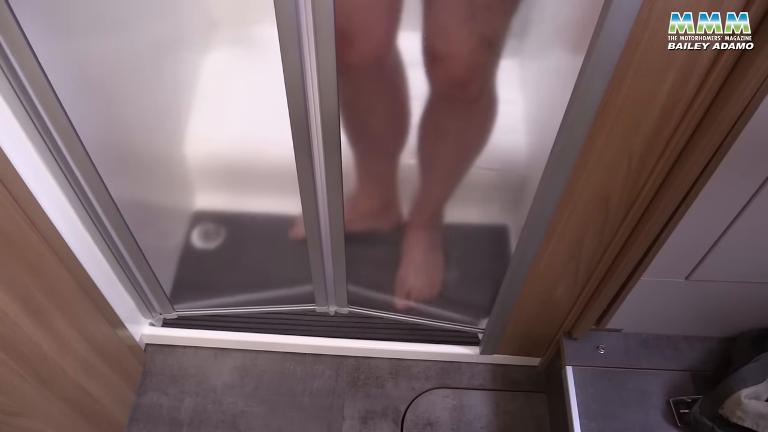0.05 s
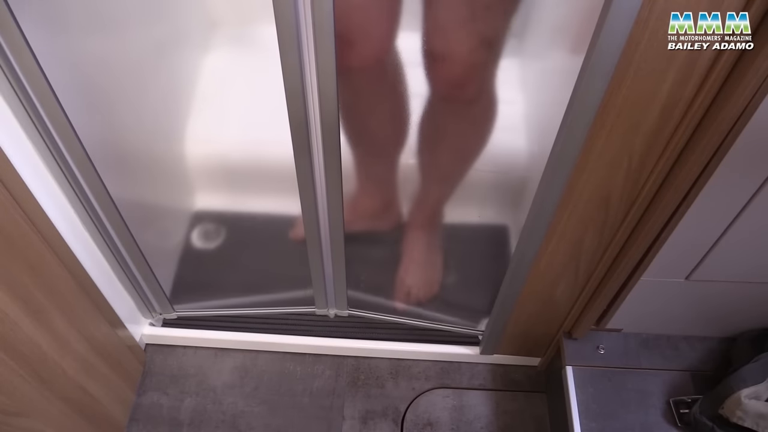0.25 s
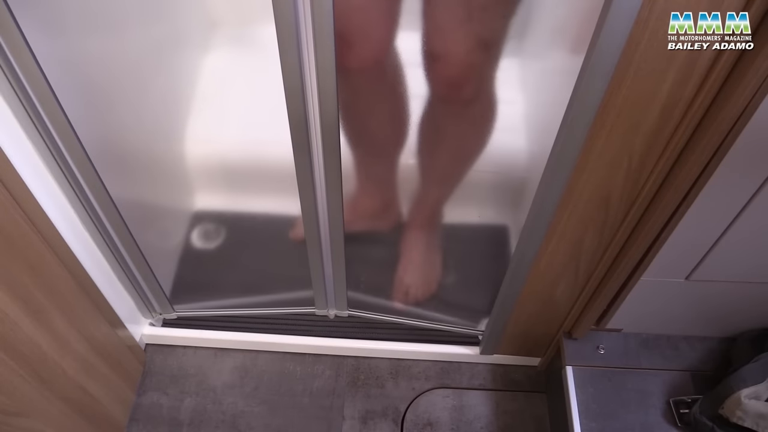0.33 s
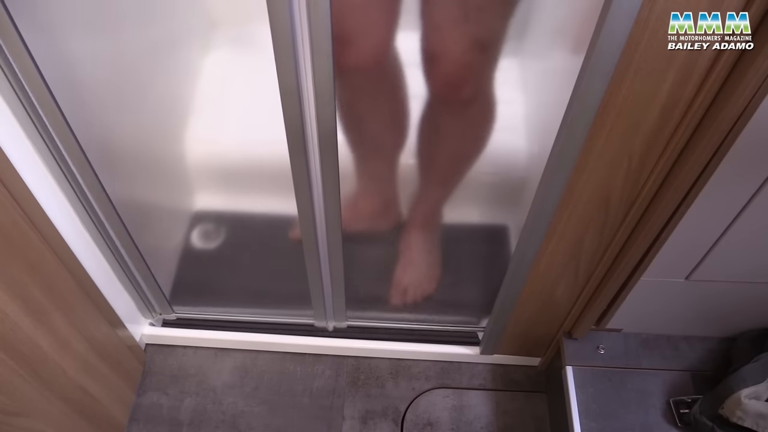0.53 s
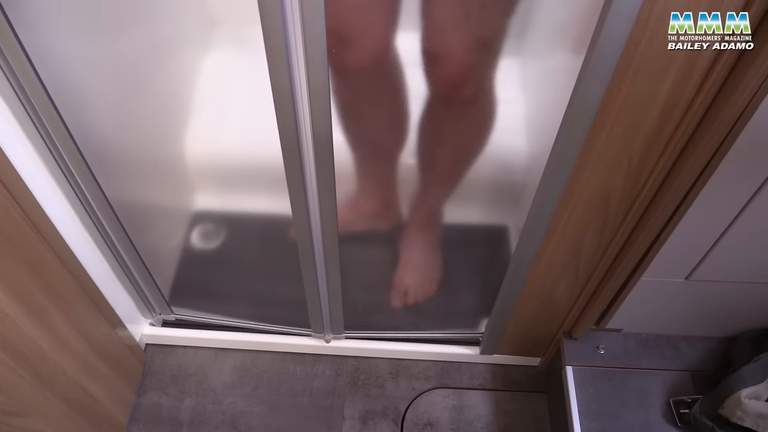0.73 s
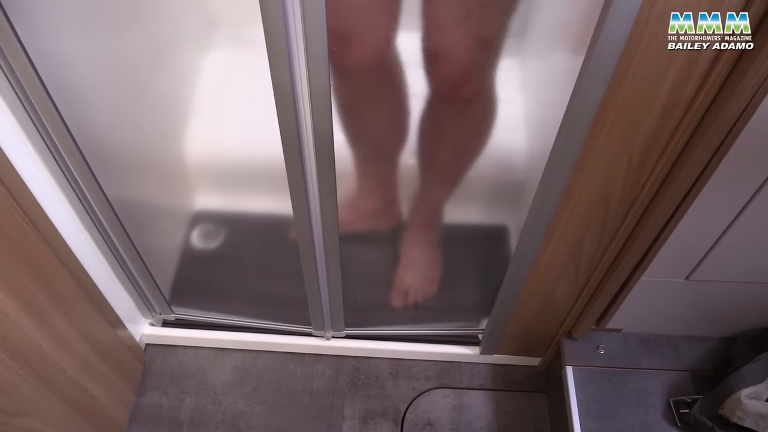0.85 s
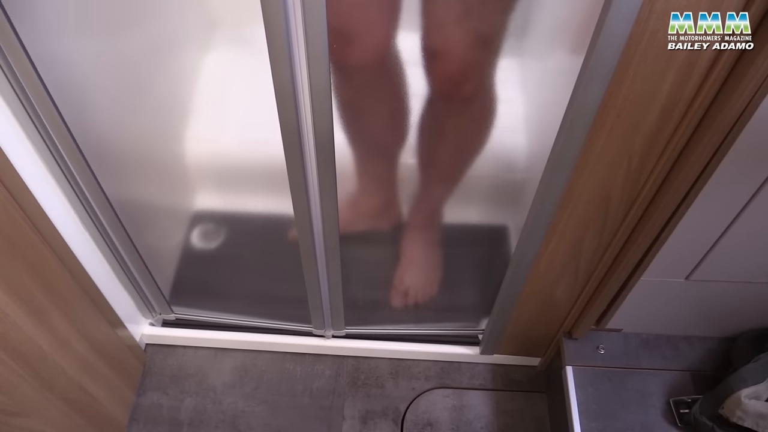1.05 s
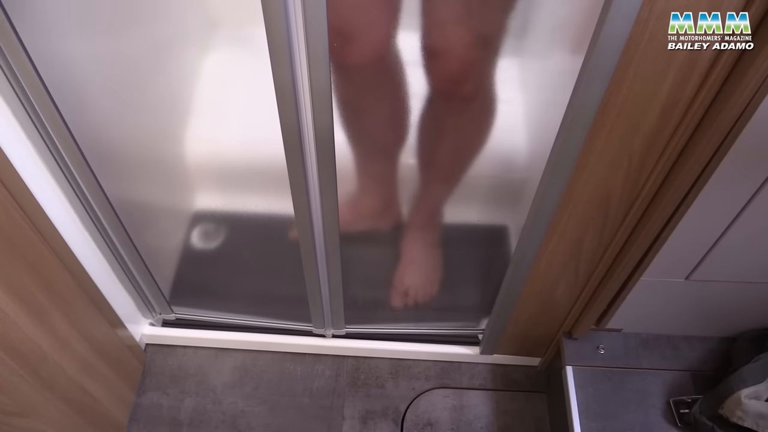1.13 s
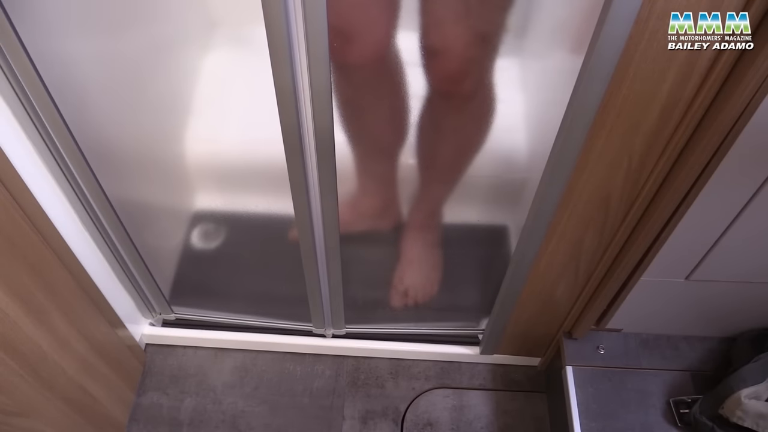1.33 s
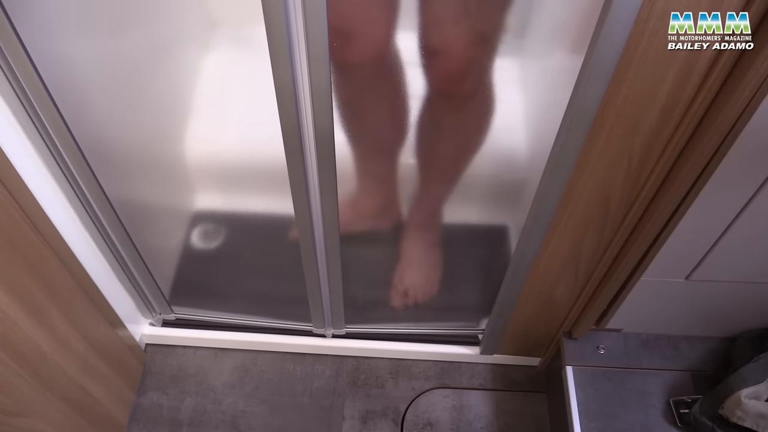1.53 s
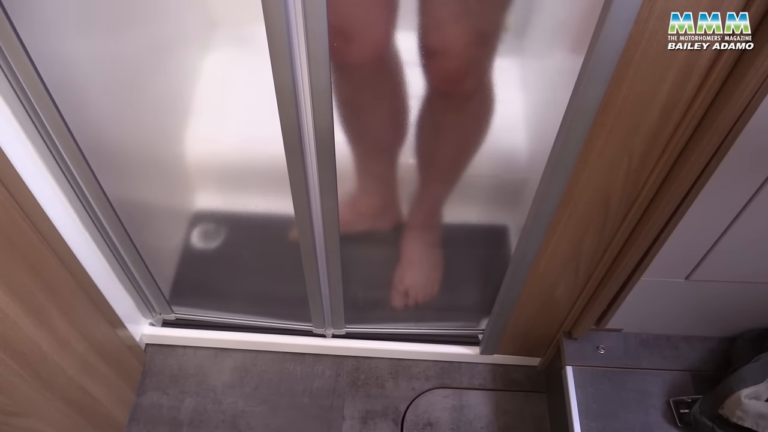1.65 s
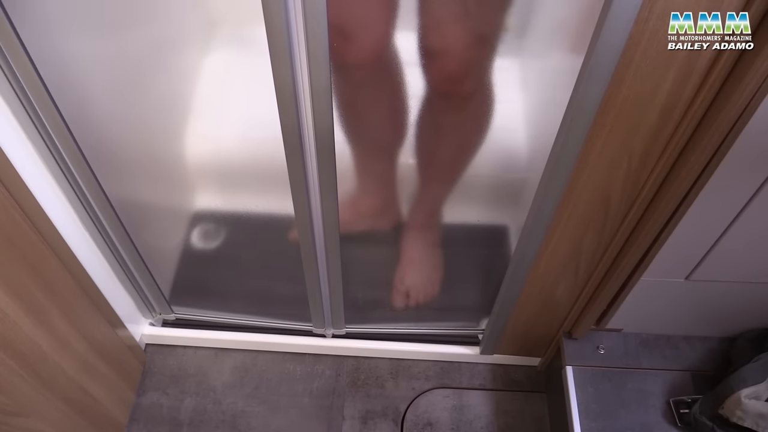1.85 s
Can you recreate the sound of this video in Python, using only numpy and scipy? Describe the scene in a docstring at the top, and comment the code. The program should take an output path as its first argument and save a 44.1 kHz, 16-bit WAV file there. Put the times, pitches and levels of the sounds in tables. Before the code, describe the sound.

Close mono pickup of a light folding shower door closing: faint ticks, a burst of dull clatter with tray thumps, sharper panel knocks, soft scraping, a short rubbing judder and a late click in a small room.

```python
"""Folding shower door pushed shut

A folding door closes in a tiny bathroom. Knocks are filtered noise bursts plus ringing frame and panel modes;
the guide ticks (band-limited bursts) and scrapes (grainy noise), and the tray thumps in low modes.
The panel judders in harmonic tones, the seal rubs (noise) and squeals (narrow rough tones), the floor rumbles.
Hard walls add a short, dense tail to every knock and tick; a quiet noise floor lies beneath."""
import sys
import numpy as np
from scipy import signal
from scipy.fft import rfft, irfft
from scipy.io import wavfile

SR = 44100
rng = np.random.default_rng(int(sys.argv[2]) if len(sys.argv) > 2 else 0)


def log_audio(samples):
    """Write samples as a 16-bit WAV file to the path given in sys.argv[1]."""
    # one column per channel
    frames = np.atleast_2d(samples).T
    # limit to full scale, then quantise
    limited = np.clip(frames, -1, 1)
    pcm = np.round(limited * 32767).astype(np.int16)
    wavfile.write(sys.argv[1], SR, pcm)


N = 83790


def undb(db):
    """Decibels to amplitude gain."""
    return 10 ** (np.asarray(db) / 20)


def unit(x):
    """Scale to rms 1."""
    return x / np.sqrt(np.mean(x ** 2))


def clock():
    """Time of every sample, s."""
    return np.arange(N) / SR


def bins():
    """Frequency of every spectral line, Hz, at least 1."""
    return np.maximum(np.arange(N // 2 + 1) * SR / N, 1)


def curve(points):
    """Points joined linearly on a log-frequency axis."""
    hz, value = np.array(points).T
    return np.interp(np.log(bins()), np.log(hz), value)


def colour(x, gain):
    """Filter by a gain per frequency, to rms 1."""
    return unit(irfft(rfft(x) * gain, N))


def noise(gain):
    """Coloured Gaussian noise, rms 1."""
    return colour(rng.standard_normal(N), gain)


def wander(rate_hz):
    """Smooth random fluctuation, rms 1, with a Gaussian spectrum."""
    return noise(np.exp(-(bins() / rate_hz) ** 2) * (bins() > 1))


def fade(t60_s):
    """Exponential decay by 60 dB in t60."""
    return np.exp(-np.log(1000) * clock() / max(t60_s, 1e-3))


def swell(start_s, length_s):
    """Sine-squared rise and fall."""
    return np.sin(np.pi * np.clip((clock() - start_s) / length_s, 0, 1)) ** 2


def add(out, start_s, x):
    """Mix a sound in from a given time."""
    i = max(int(start_s * SR), 0)
    out[i:] += x[:N - i]


def minimum_phase(gain):
    """Causal spectrum for a gain curve, by folding its cepstrum."""
    cepstrum = irfft(np.log(unit(gain) + 1e-4), N)
    cepstrum[1:N // 2] *= 2
    cepstrum[N // 2 + 1:] = 0
    return np.exp(rfft(cepstrum))


def burst(gain, decay, crack_db):
    """Dry crack plus dense resonances struck at once as noise, decaying per band, causally filtered."""
    crack_tau_s = 0.00079
    spectrum = rfft(rng.standard_normal(N))
    dense_ring = sum(irfft(spectrum * band, N) * envelope for band, envelope in decay)
    crack = undb(crack_db) * rng.standard_normal(N) * np.exp(-clock() / crack_tau_s)
    return irfft(rfft(dense_ring + crack) * minimum_phase(gain), N)


def ring(modes, rise_s, pitch=1, sustain=1, scatter=0.0037):
    """Modes that build up from rest and decay, randomly detuned at every blow."""
    t = clock()
    detune = pitch * (1 + scatter * rng.standard_normal(len(modes)))
    out = np.zeros(N)
    for k, (hz, db, t60_s) in enumerate(modes):
        sign = (-1) ** k
        out += sign * undb(db) * fade(t60_s * sustain) * np.sin(2 * np.pi * hz * detune[k] * t)
    return (1 - np.exp(-t / rise_s)) ** 2 * out


def knocks(decay, body):
    """Blows clatter the joints and ring frame and panel; a low contact cut-off is dull, a slack panel lower."""
    # blows: t/s, clatter/dB, contact cut-off f/Hz, metal edge/dB, frame ring/dB, panel ring/dB,
    # panel pitch ratio, ring length ratio
    blows = [(0.2378, -18.5, 1660, -29, -32, -52, 1.7, 0.86),
             (0.2443, -24.5, 990, -33, -14, -44, 0.61, 0.89), (0.2519, -20.5, 880, -58, -26, -27, 1.06, 1),
             (.263, -19, 923, -61, -26, -37, 0.71, 0.69),
             (0.3026, -26.5, 1100, -41, -33, -14.5, 0.95, 0.35),
             (0.4292, -27, 905, -54.5, -42, -31.5, 0.97, 0.75),
             (.658, -22.5, 1610, -71, -33, -24.5, 0.95, 0.7),
             (.678, -34, 1300, -81, -33.5, -28, 0.98, 0.55), (0.698, -30.5, 1304, -71, -62, -32, .75, 0.61),
             (.7285, -22, 1450, -41.5, -24.5, -13.5, 0.9, 0.49),
             (0.7417, -24.5, 1000, -43.5, -30, -15.5, 0.91, 0.67),
             (.758, -31.5, 1500, -51, -36, -29, 1, 0.78), (0.8644, -25.5, 3720, -44, -41, -12.5, 1.005, 1),
             (.869, -22.5, 2610, -37.5, -39, -47, .84, 0.54),
             (1.078, -31, 1680, -60.5, -39.5, -25, .99, 0.72), (1.085, -32, 1650, -64, -50, -25, 1, 0.28),
             (1.5766, -37, 2200, -76, -35, -30, .992, 0.57),
             (1.5811, -25.5, 2000, -59, -48, -13.5, 1.002, 0.94)]
    # clatter spectrum, relative: f/Hz, level/dB per Hz
    clatter_points = [(40, -15), (100, -4.5), (190, 3.5), (270, -3.5), (400, 0), (550, 6.5), (800, -1),
                      (1050, -4), (1900, -7), (3000, -9), (5000, -21.5), (16000, -7.5)]
    # metal edge spectrum, relative: f/Hz, level/dB per Hz
    edge_points = [(500, -35), (2500, 6), (3400, 2.5), (4400, 8.5), (5500, 2.5), (7000, -0.5),
                   (11000, -4.5), (15500, -13)]
    # frame modes, before pitch and length ratios: f/Hz, level/dB, t60/s
    frame_modes = [(298.9, -5.5, 0.41), (374.7, 3, 0.22), (426.6, -13, 0.33), (492.6, -4, 0.17),
                   (667, -11.5, 0.18), (782, -0.5, 0.11), (909, -7, 0.2), (1115, -13, 0.13),
                   (1311, -25, 0.23), (1396, -22.5, 0.16), (1890, -26, 0.17)]
    # panel modes, before pitch and length ratios: f/Hz, level/dB, t60/s
    panel_modes = [(293, 0.5, 0.27), (360, -18.5, 0.34), (465, -13.5, 0.27), (555.4, -18.5, 0.18),
                   (586.5, -20.5, 0.29), (1054, -37.5, 0.2), (1740, -26, 0.067)]
    frame_rise_s, panel_rise_s, frame_pitch = 0.0012, 0.0031, 0.97
    contact_order = 4.4  # roll-off exponent, in power
    crack_db = 2.5
    out = np.zeros(N)
    for start_s, db, cut_hz, edge_db, frame_db, panel_db, panel_pitch, sustain in blows:
        contact = 1 / np.sqrt(1 + (bins() / cut_hz) ** contact_order)
        clatter = undb(db) * unit(undb(curve(clatter_points)) * contact)
        edge = undb(edge_db) * unit(undb(curve(edge_points)))
        level = np.hypot(undb(db), undb(edge_db))
        blow = level * burst(np.hypot(clatter, edge) * body, decay, crack_db)
        blow += undb(frame_db) * ring(frame_modes, frame_rise_s, frame_pitch, sustain)
        blow += undb(panel_db) * ring(panel_modes, panel_rise_s, panel_pitch, sustain)
        add(out, start_s, blow)
    return out


def ticks(decay, body):
    """Small hard contacts of guide and hinges, each a burst through one Gaussian band."""
    # contacts: t/s, level/dB, centre f/Hz, width (sigma)/octaves, dry crack re ring/dB
    contacts = [(0.046, -61.5, 11600, 0.17, -10), (0.0648, -57.5, 3300, .7, -7),
                (.0817, -46.5, 1460, 1.39, -9), (.096, -65, 2830, 0.71, 0), (.112, -46, 1300, 1, 4),
                (0.1385, -54, 3030, 1.07, -8), (0.1393, -52, 1770, 0.15, 9), (0.224, -48, 3020, 0.64, 6),
                (.288, -31, 1180, 0.74, -17), (.3035, -40.5, 4540, 0.2, -1), (.3022, -52, 8200, 0.22, -2),
                (0.428, -52, 4730, .36, 14), (.429, -51, 1930, 0.78, 3), (0.493, -47.5, 1044, 0.63, -17),
                (.505, -36.5, 1530, 0.88, -22), (.547, -45, 7300, 0.88, -8), (0.6577, -42.5, 2210, 0.75, 0),
                (0.6947, -49.5, 5170, 0.36, 8), (0.7305, -42.5, 9800, 0.87, -14),
                (0.8464, -46.5, 1500, 0.81, -5), (0.8645, -39.5, 3430, 0.3, 9),
                (.864, -28.5, 1816, 0.21, 8.5), (0.949, -54.5, 9000, 0.13, -11),
                (1.099, -59, 1920, 0.47, -5), (1.1271, -48.5, 1650, 0.49, 11),
                (1.325, -52.5, 2150, 1.6, -10), (1.582, -40, 2890, 0.15, -5.5)]
    out = np.zeros(N)
    for start_s, db, hz, octaves, crack_db in contacts:
        band = np.exp(-.5 * (np.log2(bins() / hz) / octaves) ** 2)
        add(out, start_s, undb(db) * burst(body * band, decay, crack_db))
    return out


def thumps():
    """The tray booms under the moving door in three low modes."""
    # soft blows on the tray: t/s, level/dB, f/Hz
    blows = [(0.146, -28, 114.3), (0.239, -14, 124.3), (0.304, -18.5, 119.6), (0.371, -17.5, 98),
             (0.428, -19.5, 124), (.505, -27.5, 127.2), (0.659, -24.5, 60), (0.711, -27, 49),
             (0.727, -29.5, 119), (0.775, -25.5, 73), (0.865, -34.5, 111), (0.941, -33.5, 129),
             (1.085, -35.5, 115.6), (1.335, -39, 116), (1.581, -31, 117), (1.667, -36, 115.7),
             (1.802, -35, 95.8)]
    # tray modes: ratio to the thump's f, level/dB, t60/s
    tray_modes = [(.78, -11, 0.24), (1, 1.5, 0.22), (1.35, -5, .14)]
    out = np.zeros(N)
    for start_s, db, hz in blows:
        add(out, start_s, undb(db) * ring(tray_modes, rise_s=0.005, pitch=hz))
    return out


def judders(waver=0.011):
    """Stick-slip on the seal: brief swells of a wavering harmonic tone around the panel's lowest mode."""
    # swells: start t/s, length/s, level/dB, mean f/Hz
    slips = [(0.073, 0.12, -38, 245), (1.164, 0.057, -34.5, 293), (1.218, 0.1, -15, 293.6),
             (1.287, 0.1, -36, 295.8), (1.372, 0.068, -26.5, 293), (1.655, 0.065, -28.5, 268.1),
             (1.767, 0.1, -31.5, 284.2)]
    # overtones: multiple of f, level re fundamental/dB
    harmonics = [(2, -26), (3, -43), (4, -55)]
    out = np.zeros(N)
    drift = 1 + waver * wander(30)
    for start_s, length_s, db, hz in slips:
        phase = 2 * np.pi * np.cumsum(hz * drift) / SR
        overtones = sum(undb(h_db) * np.sin(round(k) * phase) for k, h_db in harmonics)
        out += undb(db) * swell(start_s, length_s) * (np.sin(phase) + overtones)
    return out


def scrapes(body, grain_db=3.0, grain_rate_hz=350):
    """The guide drags over the track: noise in dense, uneven grains, coloured by the door."""
    # drags: start t/s, attack/s, hold/s, release t60/s, grind/dB, hiss/dB
    drags = [(0.093, 0.013, 0.053, 0.13, -41, -67), (0.22, 0.016, 0.0014, 0.014, -29.5, -46),
             (0.498, 0.009, 0.06, 0.2, -39, -45), (0.533, 0.0045, 0.0083, 0.11, -81, -47.5),
             (0.812, 0.026, 0.044, 0.49, -54, -56.5), (0.956, 0.012, 0.027, 0.94, -50.5, -65),
             (1.101, 0.016, 0.022, 0.18, -48.5, -58), (1.313, 0.017, 0.019, 0.19, -39, -58.5),
             (1.375, 0.027, 0.026, 0.19, -47.5, -60.5)]
    # grind spectrum, relative: f/Hz, level/dB per Hz
    grind_points = [(60, -7), (280, 10), (550, 4), (900, -9.5), (1700, -10.5), (2800, -14), (6000, -74)]
    # hiss spectrum, relative: f/Hz, level/dB per Hz
    hiss_points = [(800, 0.5), (3400, -9.5), (4800, -7.5), (6800, -7), (10000, -10.5), (15500, -16.5)]

    def grains(points):
        """Noise with random level grains, filtered by spectrum and door."""
        rough = rng.standard_normal(N) * undb(grain_db * wander(grain_rate_hz))
        return colour(rough, body * undb(curve(points)))

    grind, hiss = grains(grind_points), grains(hiss_points)
    out, t = np.zeros(N), clock()
    for start_s, attack_s, hold_s, t60_s, grind_db, hiss_db in drags:
        rise = np.clip((t - start_s) / attack_s, 0, 1)
        release = np.exp(-np.log(1000) * np.maximum(t - start_s - attack_s - hold_s, 0) / t60_s)
        out += rise * release * (undb(grind_db) * grind + undb(hiss_db) * hiss)
    return out


def seal_rub(grain_db=2):
    """The seal rubs throughout: coloured noise under a slow level track with random grain."""
    # level track: t/s, level/dB
    track = [(0, -73), (.07, -55.5), (.3, -42), (.6, -54.5), (.645, -64), (.7, -38), (.8, -43.5),
             (1.03, -61), (1.25, -45), (1.45, -47), (1.56, -48.5), (1.73, -49.5), (1.83, -47), (1.9, -58)]
    # rub spectrum, relative: f/Hz, level/dB per Hz
    rub_points = [(40, -25), (110, 11.5), (190, -3.5), (300, 8.5), (450, 0.5), (700, -3), (1300, -10),
                  (1700, -18.5), (2500, -20.5), (3700, -29.5), (7000, -29.5), (15500, -39.5)]
    level_db = np.interp(clock(), *np.array(track).T) + grain_db * wander(68)
    return undb(level_db) * noise(undb(curve(rub_points)))


def seal_squeals(catch_db=2):
    """The seal's stiff lip squeals: narrow noise bands on gliding carriers, with uneven level."""
    # squeals: start t/s, length/s, level/dB, f at mid-length/Hz, glide/(Hz/s), width/Hz
    lip_tones = [(.81, 0.036, -62, 11100, -0.5, 200), (1.037, 0.098, -69, 10600, 14994, 152),
                 (1.099, 0.19, -67, 10300, 6003, 224), (1.16, .12, -68.5, 11400, 2999, 456),
                 (1.16, .14, -71, 13400, 2500, 223), (0.519, .1, -57, 6700, 5, 200),
                 (0.527, 0.104, -59.5, 4650, -2, 200), (1.108, 0.58, -64.5, 2843, 0.5, 190),
                 (1.202, 0.38, -61, 1956, 0.5, 70)]
    out, t = np.zeros(N), clock()
    for start_s, length_s, db, hz, glide, width_hz in lip_tones:
        phase = 2 * np.pi * np.cumsum(hz + glide * (t - start_s - length_s / 2)) / SR
        catch = undb(catch_db * wander(25))
        tone = wander(width_hz) * np.sin(phase) + wander(width_hz) * np.cos(phase)
        out += undb(db) * np.sqrt(swell(start_s, length_s)) * unit(catch * tone)
    return out


def resonances():
    """The door's close resonances as a gain curve: fixed peaks and dips plus a random ripple."""
    # body resonances: f/Hz, width/Hz, level/dB
    body_modes = [(775, 29, 2.5), (1147, 52, 7), (1318, 89, 4.5), (1494, 35, 2.5), (1709, 55, 7.5),
                  (4200, 49, -3.5), (4770, 90, 1.5), (5140, 69, 7)]
    ripple_db, ripple_width_hz, ripple_full_hz = 2, 79, 4020  # ripple depth grows up to the last
    lag_window = np.exp(-(2 * clock() * ripple_width_hz) ** 2)
    ripple = unit(rfft(rng.standard_normal(N) * lag_window).real)
    peaks_db = sum(db / (1 + (2 * (bins() - hz) / width_hz) ** 2) for hz, width_hz, db in body_modes)
    return undb(peaks_db + ripple_db * ripple * np.clip(bins() / ripple_full_hz, 0, 1))


def room_decay():
    """Overlapping bands, each with the decay of a blow: dense ring, then the tail of the room."""
    # room decay: f/Hz, t60/s
    room_t60 = [(100, 1), (400, 0.31), (1500, 0.3), (5000, 0.2), (15000, 0.063)]
    ring_t60_s, tail_db = 0.076, -10.5
    decay = []
    for hz, t60_s in room_t60:
        band = curve([(f, float(f == hz)) for f, _ in room_t60])
        decay.append((band, np.hypot(fade(ring_t60_s), undb(tail_db) * fade(t60_s))))
    return decay


def rumbles():
    """The light floor shakes under the shifting load: low noise in smooth swells."""
    # swells: start t/s, length/s, level/dB
    shakes = [(0.082, 0.22, -43), (.23, 0.29, -35), (0.628, 0.17, -34), (.75, 0.29, -44)]
    # rumble spectrum, relative: f/Hz, level/dB per Hz
    rumble_points = [(20, -3), (35, -5), (65, 5), (100, -6), (200, -30), (1000, -56)]
    envelope = sum(undb(db) * swell(start_s, length_s) for start_s, length_s, db in shakes)
    return noise(undb(curve(rumble_points))) * envelope


def room_floor():
    """The quiet of the room: steady coloured noise."""
    # floor spectrum, relative: f/Hz, level/dB per Hz
    floor_points = [(25, -18), (110, 9.5), (300, -17), (1000, -20), (4000, -28.5), (10000, -34.5),
                    (15500, -45)]
    floor_db = -55.5
    return undb(floor_db) * noise(undb(curve(floor_points)))


def scene():
    """The door over the quiet of the room, one channel."""
    decay, body = room_decay(), resonances()
    door = knocks(decay, body) + ticks(decay, body) + thumps() + judders()
    door += scrapes(body) + seal_rub() + seal_squeals() + rumbles()
    return (door + room_floor())[None]


def record(dry):
    """Steep elliptic low-pass cuts the top."""
    top_hz = 15750
    return signal.sosfilt(signal.ellip(10, .2, 80, top_hz, fs=SR, output="sos"), dry)


dry = scene()
out = record(dry)
log_audio(out)
```